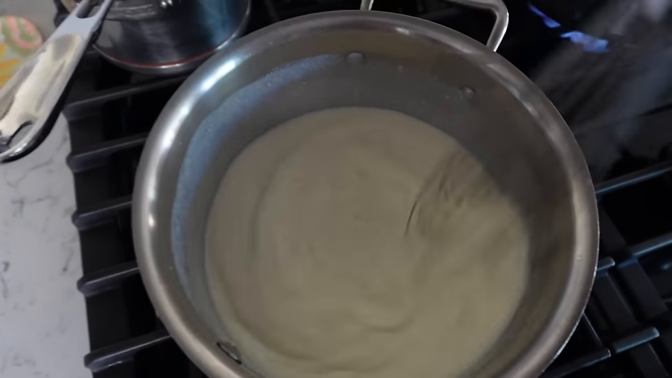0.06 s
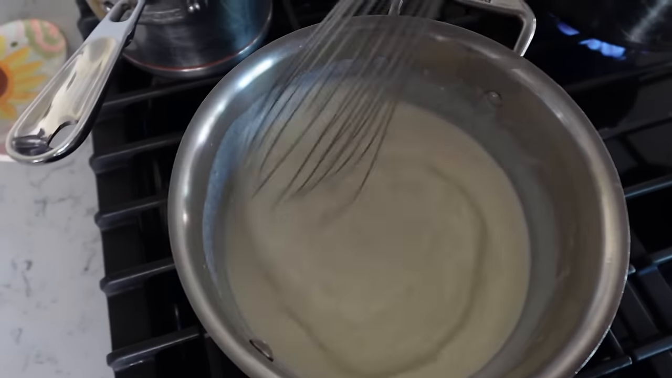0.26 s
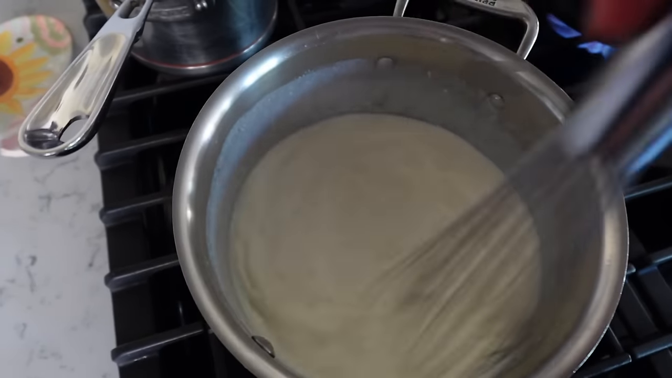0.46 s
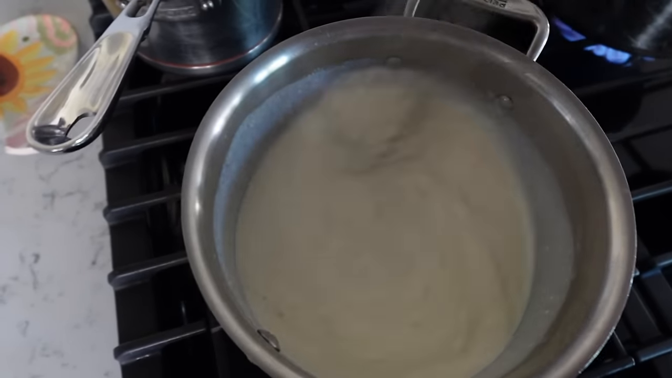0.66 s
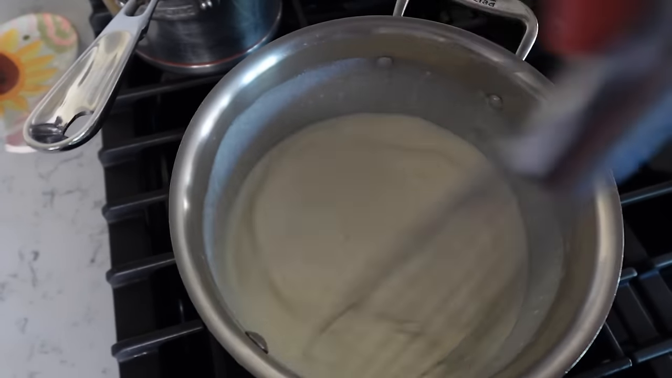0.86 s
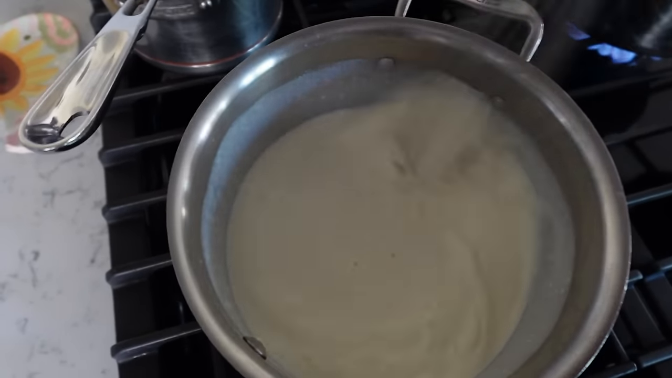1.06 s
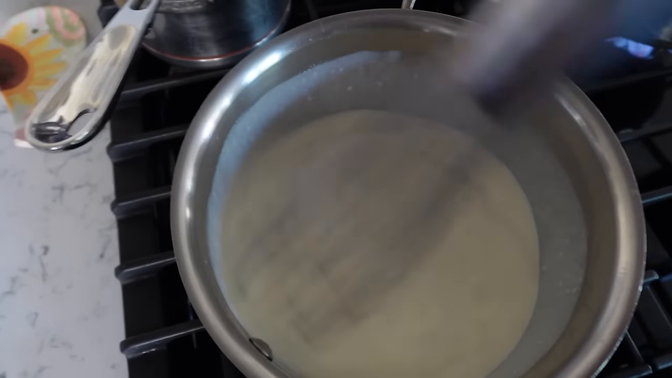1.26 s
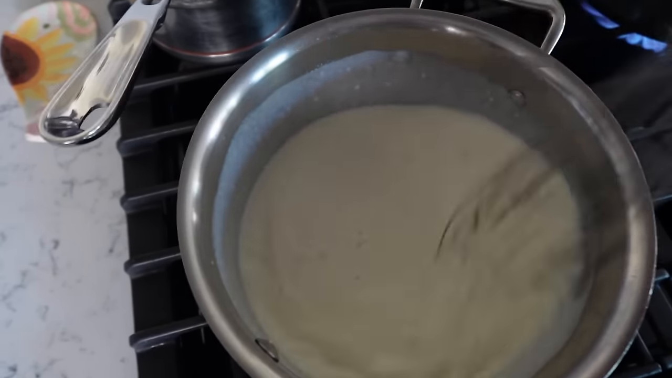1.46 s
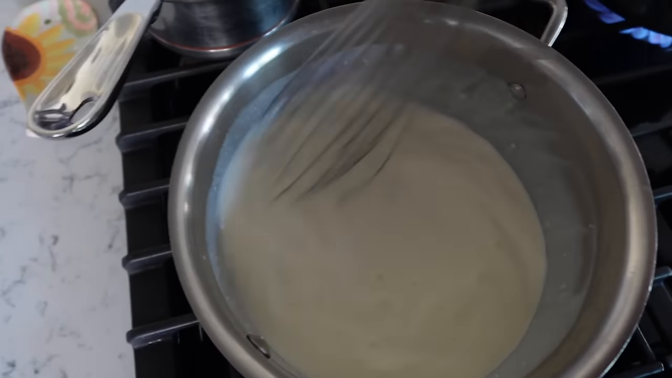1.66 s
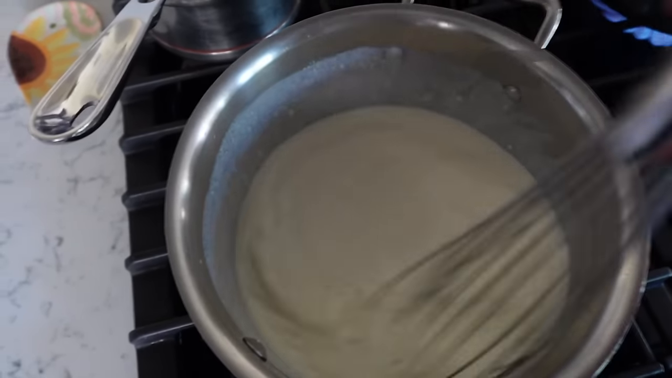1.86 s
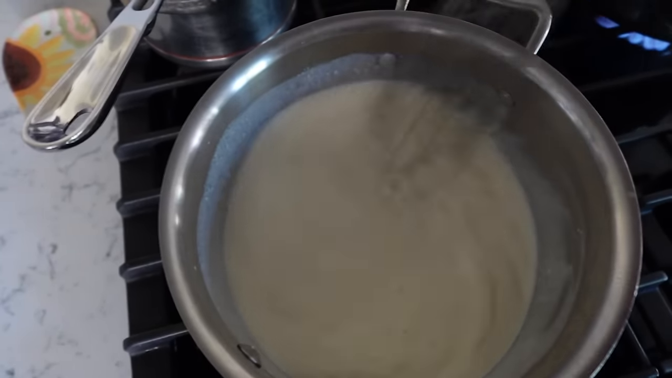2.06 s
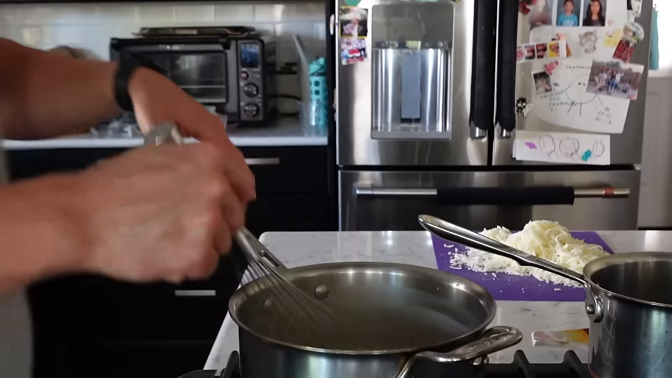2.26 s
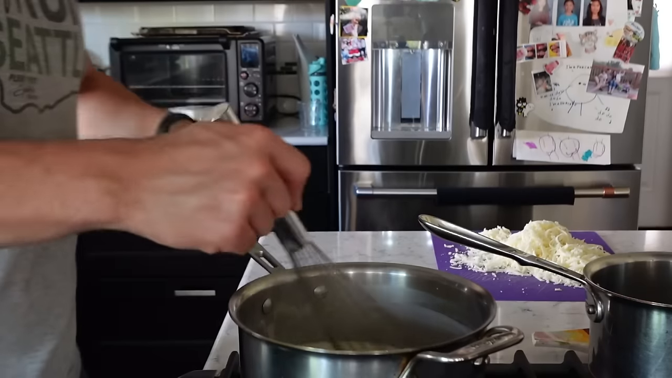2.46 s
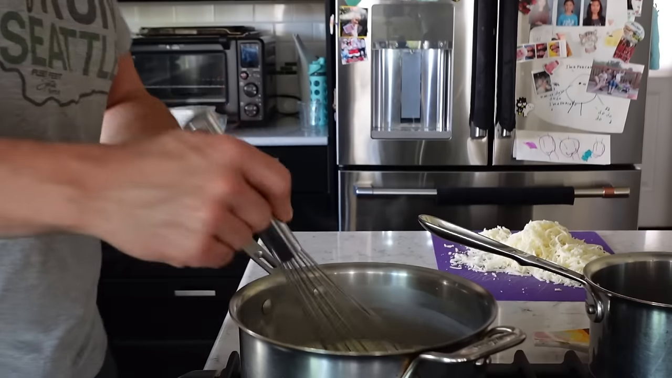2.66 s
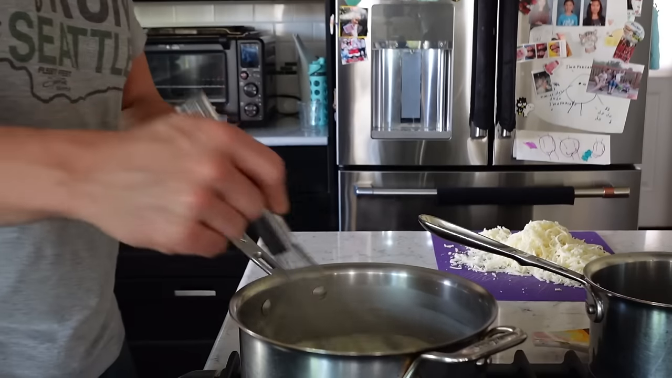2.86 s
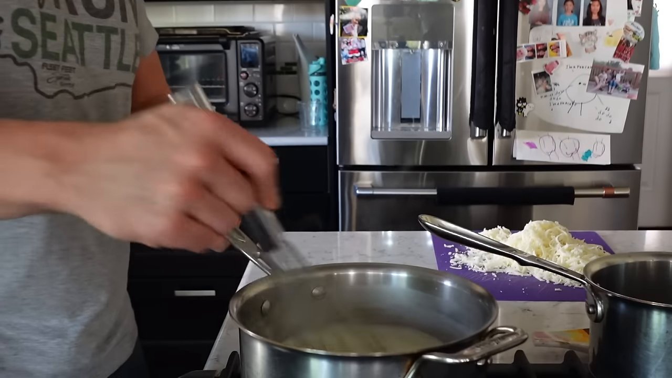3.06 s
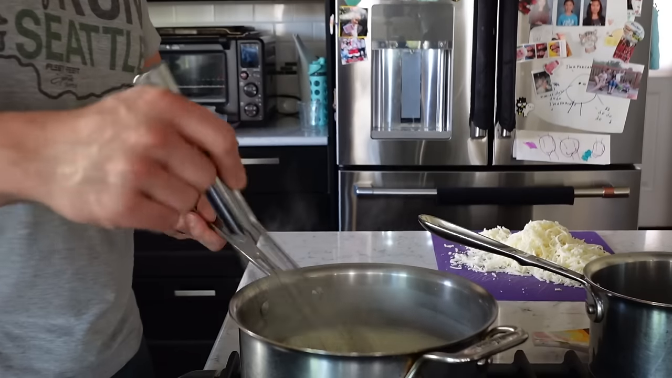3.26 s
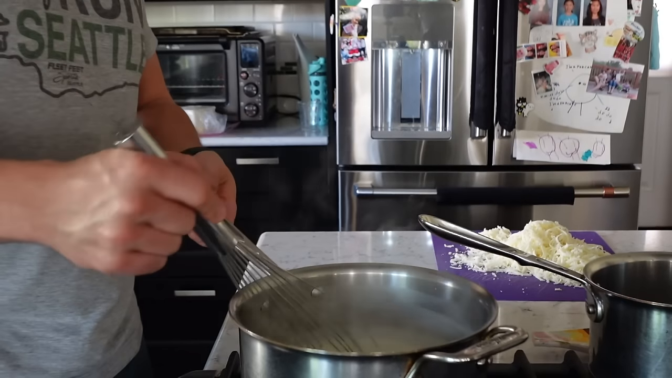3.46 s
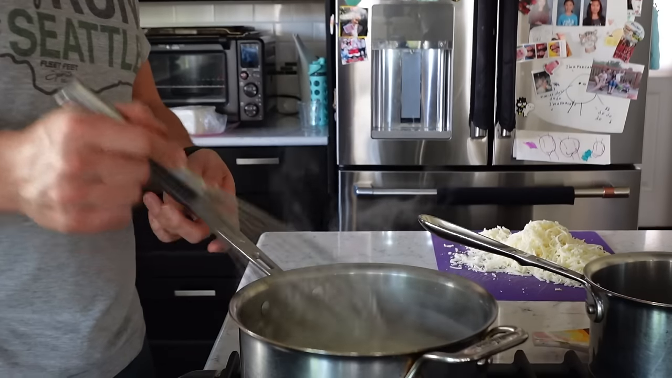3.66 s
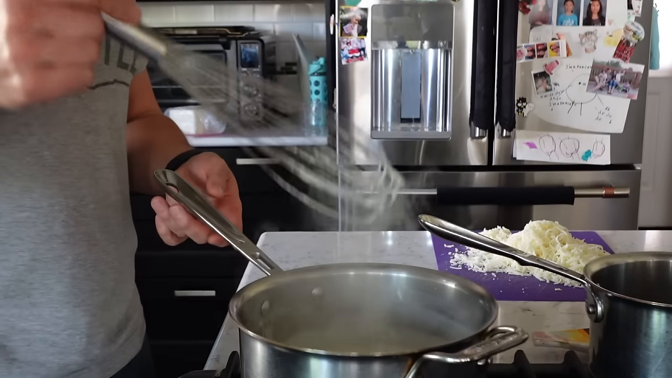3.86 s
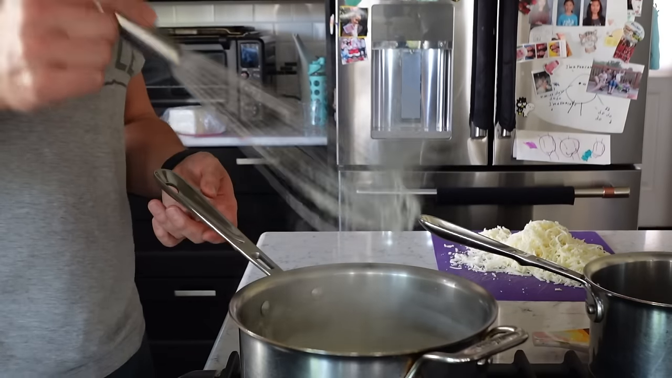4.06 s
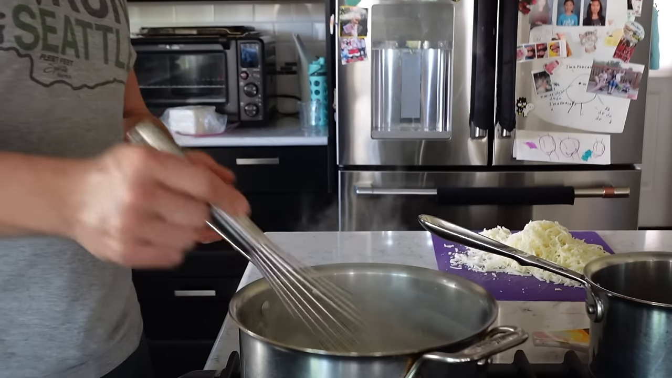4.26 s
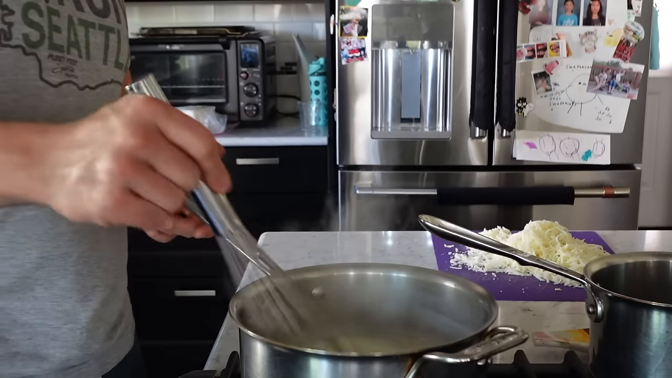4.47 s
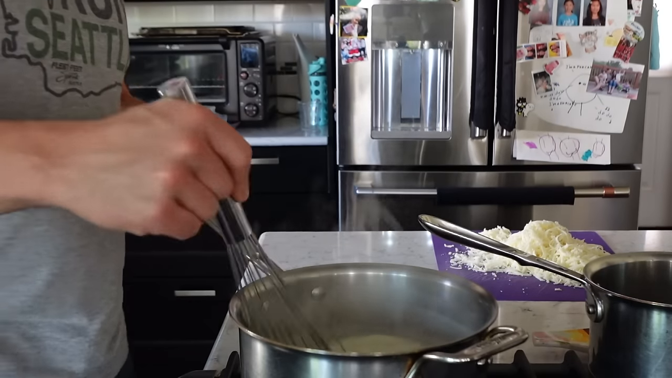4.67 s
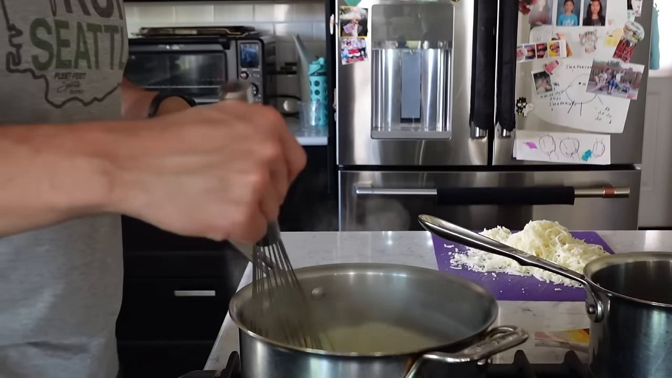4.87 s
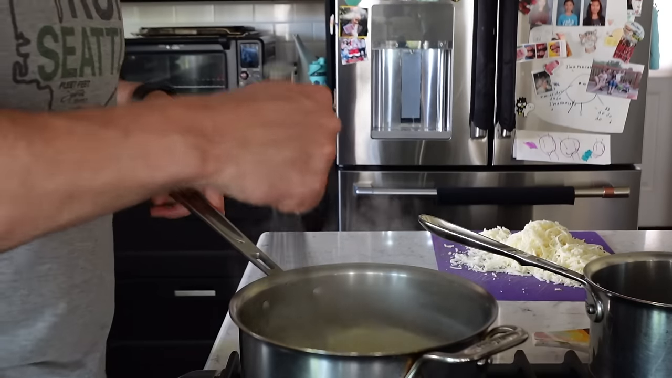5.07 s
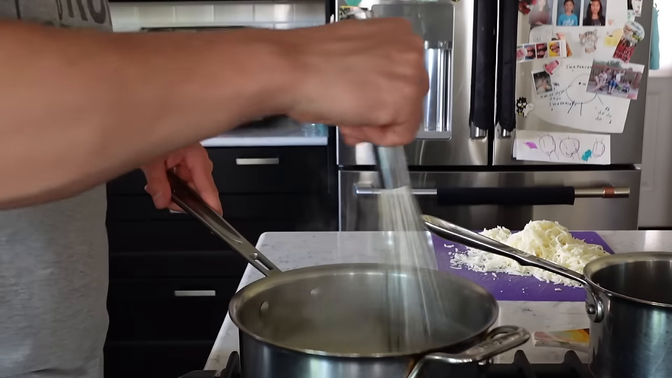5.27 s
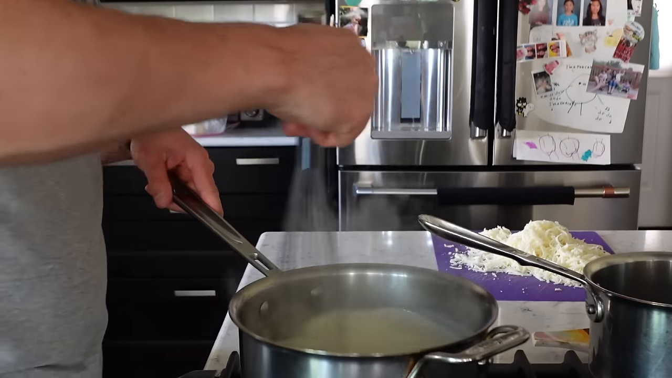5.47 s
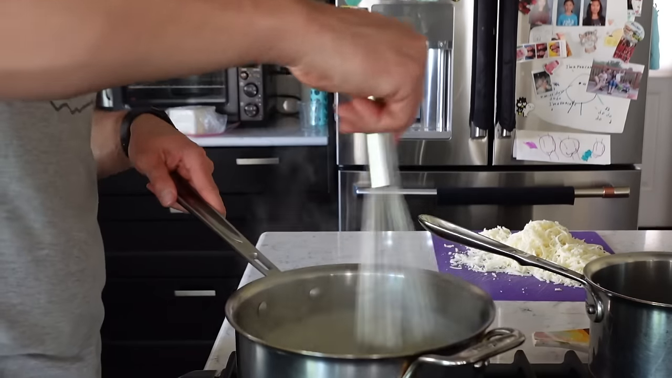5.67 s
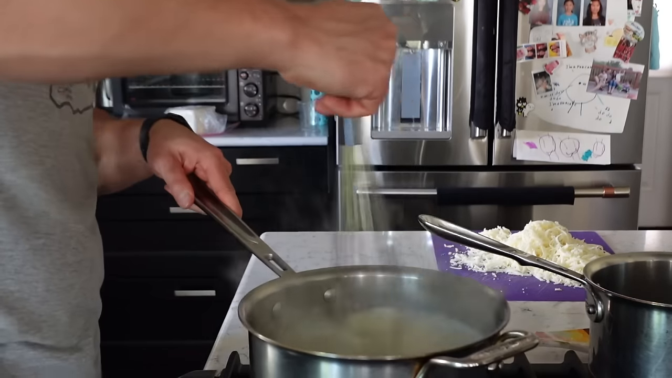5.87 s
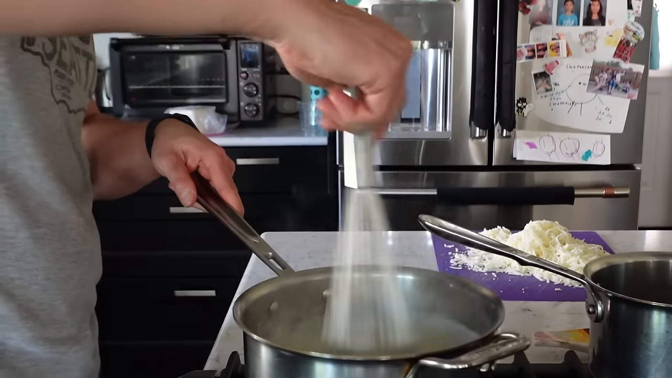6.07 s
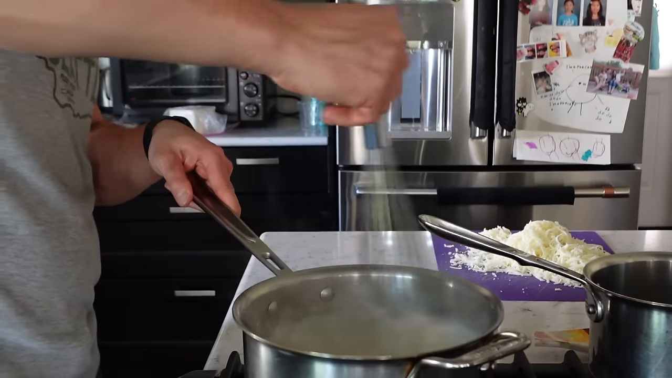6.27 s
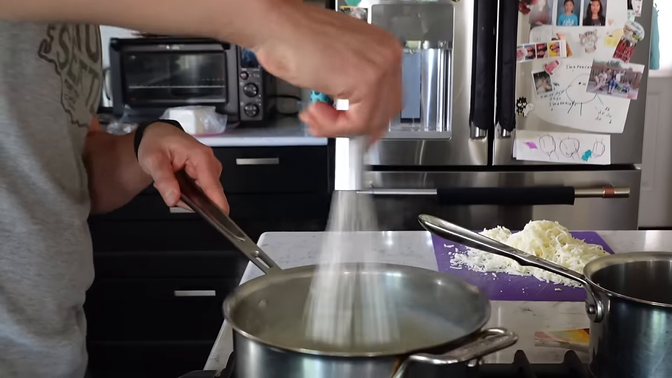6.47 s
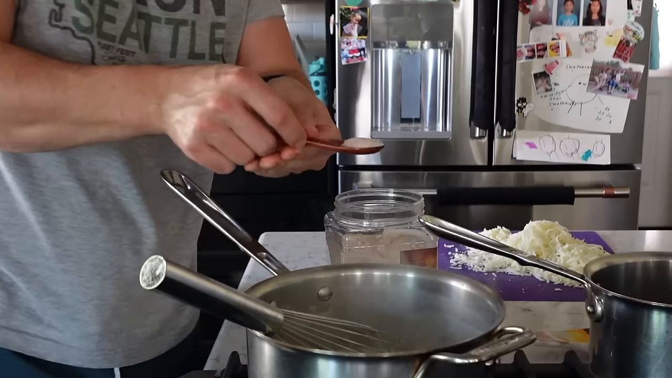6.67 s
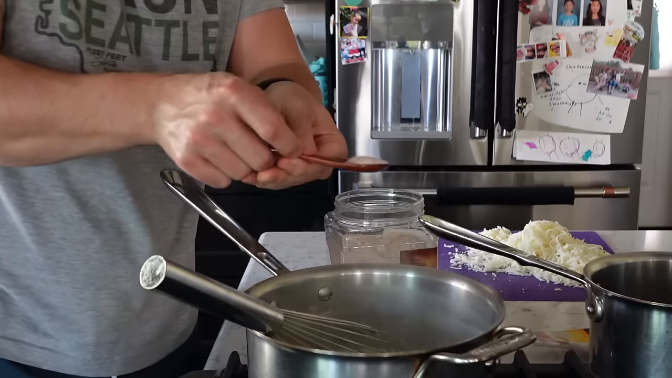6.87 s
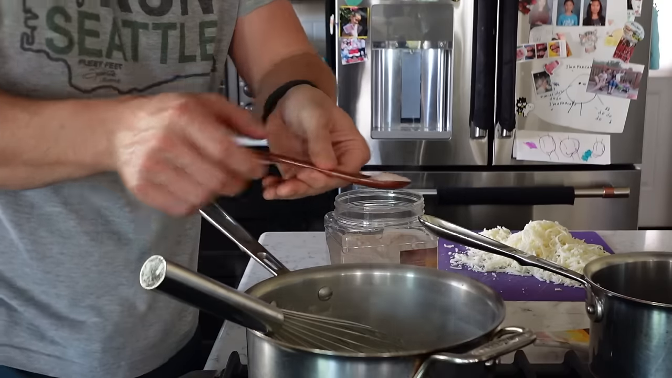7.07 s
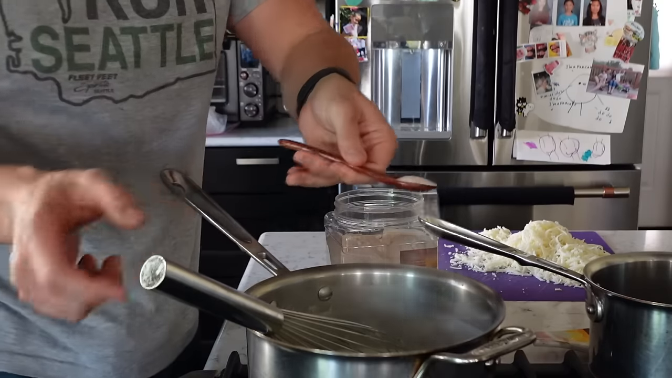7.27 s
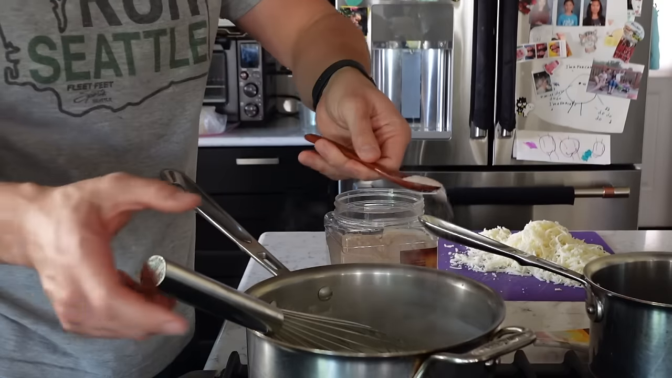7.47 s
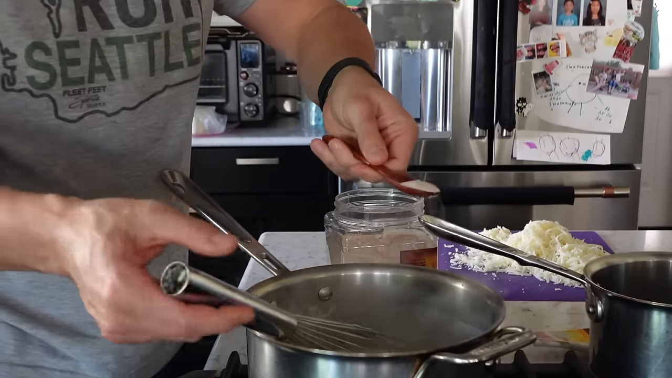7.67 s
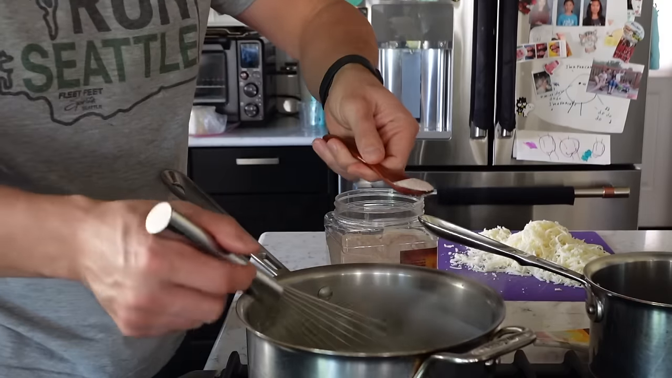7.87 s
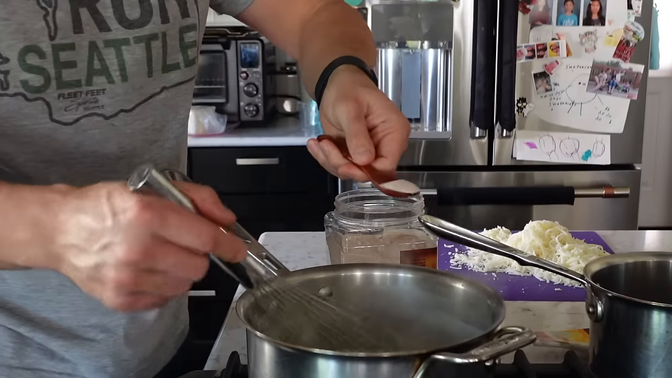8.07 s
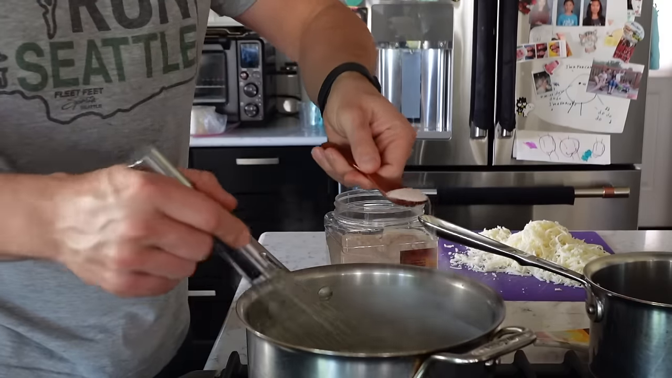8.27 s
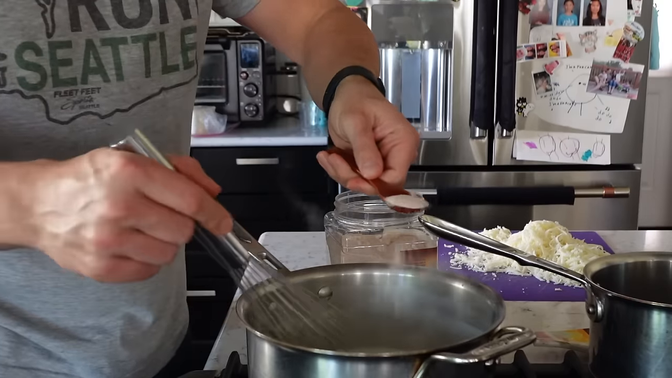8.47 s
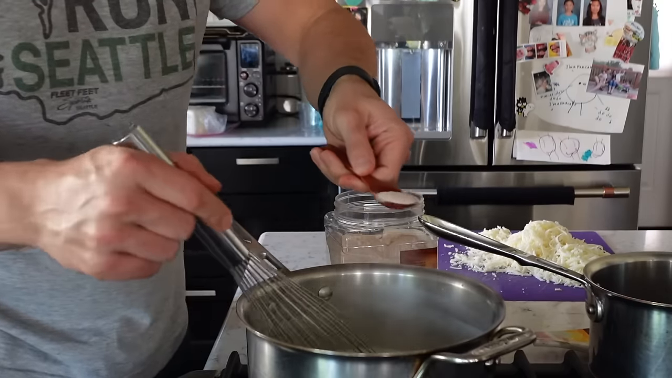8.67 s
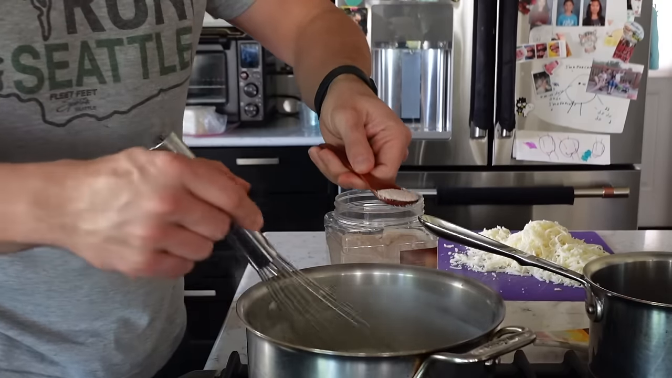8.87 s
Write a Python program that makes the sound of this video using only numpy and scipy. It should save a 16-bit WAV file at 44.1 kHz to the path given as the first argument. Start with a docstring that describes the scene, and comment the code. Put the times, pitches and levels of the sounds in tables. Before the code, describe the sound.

A low, steady motor hum and soft air hiss underlie metal whisking in a pan on a stove. Rapid scratchy strokes and wire rattles come first, heard close from above, then from the side with hollow pan knocks and a brief lull. Lively rattling strokes return before an abrupt drop to near quiet, light taps and delicate scraping. Short room echo, mono.

```python
"""In a kitchen, a wire whisk beats and scrapes sauce in a steel saucepan on a stove grate; a motor hums.
The microphone stands in three places in turn: over the pan, beside it, and beside it again later,
when the whisk first rests and then stirs gently. Scraping is made of clicks and noise, the ringing pan
of filters that resonate, the motor of steady tones, and the air of coloured noise.
Knocks, taps and ticks are short sounds that die away."""
import sys
import numpy as np
from scipy import signal
from scipy.fft import rfft, irfft
from scipy.io import wavfile

SR = 44100
rng = np.random.default_rng(int(sys.argv[2]) if len(sys.argv) > 2 else 0)


def wrap_up_sound(samples):
    """Save the sound to the file named by the first command line argument, as 16-bit audio."""
    columns = np.atleast_2d(samples).T
    # keep every value between -1 and 1, then stretch to whole-number steps
    tamed = np.clip(columns, -1, 1)
    steps = np.round(tamed * 32767).astype(np.int16)
    wavfile.write(sys.argv[1], SR, steps)


N = 393372   # length in samples

# When each microphone place begins; the last entry is the end. Each entry: time in seconds.
PLACE_TIMES = [0, 2.166, 6.537, 8.92]


def place():
    """Number the microphone place, 0 to 2, at every sample."""
    return np.searchsorted(PLACE_TIMES[1:3], np.arange(N) / SR)


def before_move(start, t):
    """True until the microphone next moves, so that a sound stops there."""
    return start + t < PLACE_TIMES[np.searchsorted(PLACE_TIMES, start)]


def amp(db):
    """Turn decibels into a gain; twice the decibels gives a power."""
    return 10 ** (np.asarray(db) / 20)


def rms_one(x):
    """Scale a signal so that its root mean square is 1."""
    return x / np.sqrt(np.mean(x ** 2) + 1e-20)


def drift(rate):
    """Wander randomly around zero with spread 1; a higher rate (Hz) wanders faster."""
    step = 40   # samples between the points of the slow curve
    r = np.exp(-2 * step * np.pi * rate / SR)
    noise = rng.standard_normal(N // step + 2002)
    slow = signal.lfilter([1], [1, -2 * r, r * r], noise)[2000:]   # leave out the settling
    slow = rms_one(slow - slow.mean())
    return np.interp(np.arange(N) / step, np.arange(len(slow)), slow)


def coloured(x, spectrum):
    """Give a flat signal a spectrum, drawn through points of Hz and dB."""
    hz, db = np.transpose(spectrum)
    bins = np.maximum(np.arange(N // 2 + 1) * SR / N, 1)
    return irfft(rfft(x) * amp(np.interp(np.log(bins), np.log(hz), db)), N)


def band(x, low_hz, high_hz):
    """Keep the pitches between two limits."""
    sos = signal.butter(2, [low_hz, high_hz], "band", fs=SR, output="sos")
    return signal.sosfilt(sos, x)


def resonance(x, hz, width):
    """Ring at one pitch; a narrow width (Hz) rings longer. Unit white noise comes out at rms 1."""
    r = np.exp(-np.pi * max(width, 5) / SR)
    gain = np.sqrt((1 - r * r) / 2)
    return signal.lfilter(gain * np.array([1, 0, -1]), [1, -2 * r * np.cos(2 * np.pi * hz / SR), r * r], x)


def pings(events, noisy):
    """Play short dying tones, each a pure tone plus a share of noise ringing around its pitch."""
    out, t = np.zeros(N + SR), np.arange(SR // 4) / SR
    puffs = rng.standard_normal((len(events), len(t)))
    for (start, db, hz, t60), puff in zip(events, puffs):
        tone = np.sin(2 * np.pi * hz * t) + noisy * resonance(puff, hz, 0.092 * hz)
        tone *= before_move(start, t)
        fade = amp(db - 60 * t / np.clip(t60, .01, .5))
        out[round(start * SR):][:len(t)] += fade * tone
    return out[:N]


# Colour of the kitchen air.
# Each row: pitch in Hz, then relative level in dB per Hz at each of the three places.
AIR_COLOUR = [(25, -25.5, -31, -32), (60, -13.5, -15, -5), (113, 3, -4, 4), (199, 0, -4.5, 1.5),
              (304, -2, -6.5, -1), (398, 0, -10.5, 5.5), (512, -14, -15.5, -10.5), (660, -34, -37, -30),
              (1060, -44, -19.5, -15), (1310, -10, -27, -18.5), (1740, -17, -22.5, -13),
              (2270, -27, -26, -31), (3500, -39, -27, -26), (5500, -35.5, -29, -34.5),
              (8000, -27.5, -36, -27), (16000, -40, -37, -34)]
# Loudness of the air, before a slow drift. Each entry: rms level in dB at one place.
AIR_LEVELS = [-44.5, -44, -45.5]


def air():
    """Colour white noise into the steady hiss and rumble of the kitchen, wavering slightly."""
    white, at, table = rng.standard_normal(N), place(), np.array(AIR_COLOUR)
    heard = [rms_one(coloured(white, table[:, [0, k + 1]])) for k in range(3)]
    level_db = np.array(AIR_LEVELS)[at] + 1.0 * drift(9)
    return amp(level_db) * np.choose(at, heard)


MAINS_HUM_HZ, TURNS_HZ = 119.9, [44.82, 44.94, 44.28]   # magnetic hum; motor turns a second at each place
# Where the motor tones sit. Each row: multiple of the hum, multiple of the turn rate.
MOTOR_ORDERS = [(1, 0), (2, 0), (3, 0), (0, 1), (0, 2), (0, 3), (0, 4), (0, 5), (0, 6), (0, 7), (0, 8),
                (0, 9), (1, 1), (1, 2), (1, 3), (1, 4), (1, 5), (1, 6), (2, -2), (2, -1), (2, 1), (2, 3),
                (2, 4), (2, 6)]
# How loud those tones are. Each row: one place, with the rms level in dB of every tone in turn.
MOTOR_LEVELS = [
    [-50.5, -46.5, -78, -82, -91, -56.5, -49.5, -57, -57.5, -99, -99, -59, -75, -93, -80, -93, -80, -58,
     -87, -83, -90, -49.5, -73, -60],
    [-44.5, -53.5, -81.5, -77, -76, -48.5, -43.5, -46, -57, -76, -59, -80, -55.5, -57, -78, -65, -81, -69,
     -54.5, -72, -62, -61.5, -62, -63.5],
    [-47, -73, -56, -69, -66, -48.5, -41, -52, -54, -56, -73, -51, -60, -52, -54, -49, -51.5, -53.5, -57,
     -70, -64, -50, -73, -69],
]


def motor():
    """Mix magnetic hum and turn rate into sum and difference tones; the turn rate wavers a little."""
    t, at, out = np.arange(N) / SR, place(), np.zeros(N)
    wavering_time = t + np.cumsum(0.0018 * drift(1.57)) / SR
    hum, turn = np.transpose(MOTOR_ORDERS)[:, :, None]
    for k in range(3):
        here = at == k
        cycles = hum * MAINS_HUM_HZ * t[here] + turn * TURNS_HZ[k] * wavering_time[here]
        tones = np.sin(2 * np.pi * (cycles + rng.random(hum.shape)))
        out[here] = np.sqrt(2) * amp(MOTOR_LEVELS[k]) @ tones
    return out


LANDS_S = 4.307   # the lifted whisk drops back into the pan


def swell(start, held, rise, fall):
    """Grow in power to 1, hold and sink again; rise and fall are seconds per 10 dB, at least 3 ms."""
    out, t = np.zeros(N), np.arange(N) / SR
    k = np.searchsorted(PLACE_TIMES[1:3], start)
    held, rise, fall = max(held, 0), max(rise, .003), max(fall, .003)
    # stay within one place, and start no earlier than the landing if the sound comes after it
    first = max(PLACE_TIMES[k], LANDS_S * (start > LANDS_S), start - 4 * rise)
    last = min(PLACE_TIMES[k + 1], start + held + 4 * fall)
    near = slice(int(first * SR), int(last * SR))
    before, after = (start - t[near]) / rise, (t[near] - start - held) / fall
    out[near] = amp(-20 * np.maximum(0, np.maximum(before, after)))
    return out


# Light contact between strokes, one table for each place.
# Each row: time in seconds, scrape in dB, rub on the pan floor in dB, level above 8 kHz in relative dB.
LIGHT_CONTACT = [
    [(0, -29.5, -42, -6), (.85, -30, -46.5, -5.5), (1.1, -31.5, -43, -4), (1.35, -34, -56, -6.5),
     (1.52, -33, -52, -7), (1.88, -34, -48, -6.5), (2.166, -29, -41, -5.5)],
    [(2.166, -37.5, -42.5, -2.5), (3.0, -33, -42.5, -1.5), (3.3, -33.5, -43.5, -4.5),
     (3.66, -41, -42, -6.5), (3.92, -40, -50, -3), (4.14, -48, -55, -8), (4.22, -61, -68, -10),
     (4.304, -80, -85, -10), (4.31, -41, -50, -2), (4.5, -41, -54, -4), (4.9, -37, -46, 1.5),
     (5.2, -37.5, -46.5, -1), (5.6, -33, -48, -2), (6.537, -36, -52, -1)],
    [(6.537, -70, -63, 2), (6.9, -58.5, -53, -11), (7.33, -64, -62, -5), (7.89, -63, -61, -4),
     (8.1, -55, -53.5, 0), (8.45, -44, -54.5, -1), (8.92, -60, -59.5, -2)],
]
# Ringing of the pan under light contact. Each entry: relative level in dB at one place.
LIGHT_RINGING = [-1.5, 0.5, 3]
# The whisk is drawn through the pan. Each row: time of full strength in seconds, held time in seconds,
# scrape in dB, rub on the pan floor in dB, ringing in dB relative to the scrape,
# rise in seconds per 10 dB, fall in seconds per 10 dB (swell() raises times that are too short).
WHISK_SWEEPS = [(0, 0.023, -21, -32, -4, .1, 0.05), (0.171, .14, -19.5, -37, -1.5, .07, -0.07),
                (.41, 0.053, -24, -48.5, -3, .01, -0.1), (.47, 0, -25, -39, -4, -0.03, .05),
                (0.541, 0.054, -23, -38.5, 1, .02, -0.04), (.606, 0.055, -22.5, -36.5, -1, .004, -0.14),
                (0.731, 0.043, -17.5, -38.5, -3.5, 0.08, 0.04), (.865, 0.032, -26, -55, 6, .01, .05),
                (.92, 0.043, -23.5, -37.5, 0, 0, 0.03), (1.08, 0.044, -20.5, -37.5, 0, 0.06, 0.12),
                (1.24, 0.028, -28, -40, 0, 0.1, -0.07), (1.335, 0.044, -27.5, -60, 5.5, 0.03, 0),
                (1.42, 0.014, -27.5, -37.5, 2.5, -0.1, .07), (1.56, .19, -23, -42.5, -0.5, 0.06, -0.1),
                (1.78, .05, -24, -50, 5, .005, .04), (1.93, .03, -25, -42, 3, .005, .06),
                (2.02, 0.029, -27.5, -39, -11, -0.1, 5), (2.089, .075, -20, -33.5, -2, -0.06, 0),
                (2.17, 0.0047, -28, -38, 3.5, 0.5, 0), (2.36, 0.054, -30, -50, -3, .1, 0.03),
                (2.5, 0.018, -31.5, -37.5, -4, 0.3, 0), (2.65, 0.0097, -27.5, -38.5, -3, .03, 0.15),
                (2.84, 0.027, -27, -36, -1, .02, 0.06), (3.07, 0, -24.5, -37.5, 3, .05, 0.0546),
                (3.2, .02, -32, -42, 3, .03, .04), (3.385, .04, -21, -28, 1, 0.08, 0.1133),
                (3.52, 0.084, -27, -32, 1, -0.14, .05), (4.32, 0.028, -27.5, -35, -0.5, 3, .11),
                (4.53, 0.11, -35, -45, 2.5, 0, .06), (4.66, 0.0028, -35.5, -47, -1, 0, 0.1),
                (4.75, .14, -34, -44.5, -3.5, -0.1, 0.1), (4.98, 0.03, -28, -41, -2, -0.07, -0.23),
                (5.08, 0.055, -24.5, -56, -5, -0.02, -0.1), (5.275, .055, -25, -41, 1, 0.064, .06),
                (5.42, 0.067, -27, -57, 3.5, 0.08, .08), (5.61, 0.063, -26, -42.5, -2, -0.01, 0.07),
                (5.83, 0.043, -27, -40.5, -0.5, -0.05, .06), (5.98, 0.075, -28.5, -41.5, 1, 0, -0.4),
                (6.07, 0.038, -22.5, -39.5, 1.5, -0.05, .07), (6.29, 0.012, -28.5, -47, 2, 0, 0.2),
                (6.39, 0.026, -25.5, -47, 1.5, 0, 0.2), (6.49, 0.036, -21.5, -44.5, -1, -0.01, -0.6),
                (6.72, 0.065, -52, -58.5, -6, 0.2, 0.2), (7.14, 0, -58, -64, -4, 0.2, 0.7),
                (7.9, 0.0017, -49, -55, -5, .005, .05), (8.04, 0.0038, -41.5, -47.5, -4, 0.07, -0.04),
                (8.2, .12, -40.5, -54, 1, 0.1, 0.1), (8.41, 0.019, -39, -58, -1, 0.05, -0.1),
                (8.52, 0.07, -42, -54, -2, .06, -0.8), (8.66, .03, -44.5, -50, 1, -0.02, -0.3),
                (8.8, 0.07, -43.5, -57, 3, .05, .1), (8.88, 0.022, -40, -50, 4, 0.03, .1)]


def strokes():
    """Add sweeps to light contact: power of scrape, floor rub and ringing, and the treble level in dB."""
    t, at, light = np.arange(N) / SR, place(), np.zeros((3, N))
    for k, rows in enumerate(LIGHT_CONTACT):
        times, *columns = np.transpose(rows)
        light[:, at == k] = [np.interp(t[at == k], times, column) for column in columns]
    scrape_db, floor_db, treble_db = light
    power = amp(2 * np.array([scrape_db, floor_db, scrape_db + np.array(LIGHT_RINGING)[at]]))
    for start, held, scrape_db, floor_db, ring_db, rise, fall in WHISK_SWEEPS:
        sweep_db = np.array([[scrape_db], [floor_db], [scrape_db + ring_db]])
        power += amp(2 * sweep_db) * swell(start, held, rise, fall)
    return *power, treble_db


def friction(per_s, spread_db, smooth):
    """Make wires slip and catch: uneven random clicks over a smooth rub of noise."""
    sizes = amp(spread_db * np.minimum(rng.exponential(1, N), 3.5)) * rng.choice([-1, 1], N)
    chance = per_s * amp(4 * drift(40)) / SR
    clicks = sizes * (rng.random(N) < chance)
    return rms_one(rms_one(clicks) + smooth * rng.standard_normal(N))


# Colour of the scrape from over the pan. Each row: pitch in Hz, relative level in dB per Hz.
ABOVE_COLOUR = [(350, -32), (600, -2.5), (748, -37), (984, -9.5), (1230, -13.5), (2470, -7), (5120, -2.5),
                (7520, -2), (14700, -2.5), (16000, -4)]
# Colour of the scrape from beside the pan. Each row: pitch in Hz, relative level in dB per Hz.
SIDE_COLOUR = [(350, -22), (600, -14.5), (1830, -6), (1980, -46), (2210, -7.5), (3990, -2), (4520, -6),
               (6550, 2.5), (14900, -8), (16000, -9)]


def broad_scrape(slips, floor_db, treble_db):
    """Colour the dense slips and mix three bands: pan floor, middle and treble."""
    broad = np.where(place() == 0, coloured(slips, ABOVE_COLOUR), coloured(slips, SIDE_COLOUR))
    bands = [band(broad, 825, 2460), band(broad, 2780, 8530), band(broad, 7220, 15500)]
    levels_db = [floor_db + 2.2 * drift(11.3), -3.0, treble_db + 1.26 * drift(6.4)]
    return amp(-1.5) * sum(rms_one(b) * amp(db) for b, db in zip(bands, levels_db))


def flecks(per_s, level_db):
    """Wires brush one another at random and chirp briefly, each at one of 24 pitches."""
    born = rng.random(N) < per_s / SR
    sizes = amp(4.7 * np.minimum(rng.exponential(1, N), 3))
    dealt = rng.integers(0, 24, N)   # which pitch each chirp gets
    pitches = np.geomspace(2900, 14500, 24) * (1 + 0.0367 * rng.standard_normal(24))
    chirps = np.zeros(N)
    for k, hz in enumerate(pitches):
        chirps += resonance(sizes * born * (dealt == k) + 1e-18, hz, 0.011 * hz)
    return amp(level_db) * rms_one(chirps)


# Pan and wires ring. Each row: pitch in Hz, width in Hz before narrowing,
# then relative level in dB at each of the three places.
PAN_MODES = [(957, 81, -7, -9.5, -12.5), (1270, 17, -34.5, -12, -22), (1608, 32, -15, -27, -9.5),
             (1990, 72, -6, -7, -9), (2123, 186, -1, -7.5, -11), (2403, 30, -18, -16, -6.5),
             (2554, 62, -15.5, -11.5, -22), (3245, 210, -9.5, -4, -9.5), (3425, 114, -29, -4, -6.5),
             (3950, 210, 6, 1.5, 0.5), (4237, 140, 0.5, -1, -9), (4530, 250, -9, -6, 0),
             (4780, 160, -26, -9, -11), (5080, 320, 6.5, -7, -10), (5370, 26, -10, -6, -24),
             (5780, 670, -20, -5.5, -4), (6590, 110, -9, -1.5, -3), (7360, 850, -13, 2, 2.5),
             (8740, 640, -2.5, -4, -10), (9280, 330, 4, -4, -8), (10180, 540, 2.5, -3, -7),
             (11330, 1200, -31, -4, -6), (12800, 200, -10, -9, -9), (14760, 650, 0, -9, -8)]
# Narrowing of the rings. Each entry: factor on the width at one place; a smaller one rings longer.
MODE_NARROWING = [0.74, 1, 0.74]


def pan_ringing(catches, struck, floor_db, treble_db):
    """Let catches ring the pan and wires; each mode wanders in level by itself."""
    at, out = place(), np.zeros(N)
    for k, (hz, width, *place_db) in enumerate(PAN_MODES):
        share_db = floor_db + 11.5 if hz < 2300 else treble_db + 6.5 if hz > 8000 else 0
        wander_db = 2.64 * drift(20.5) + 2.13 * drift(5.0)
        level_db = np.array(place_db)[at] + share_db - 14.5 + wander_db
        driven = catches * struck[k % 4] * amp(level_db)
        for j, narrow in enumerate(MODE_NARROWING):
            ring = resonance(driven[at == j], hz, width * narrow)
            out[at == j] += ring * (-1) ** k   # flip every second mode
    return out


# The pan shudders on the grate. Each row: time of the peak in seconds, relative level in dB.
GRATE_JOLTS = [(.03, -51), (.11, -55), (.57, -55), (.82, -52.5), (.91, -52.5), (1.44, -52), (1.74, -55),
               (2.06, -58), (2.25, -49.5), (2.44, -44), (2.65, -47), (2.87, -43), (3.07, -47.5),
               (3.17, -43.5), (3.41, -38), (3.6, -49), (4.345, -46), (4.57, -50.5), (4.76, -50),
               (4.97, -55), (5.69, -52), (5.82, -51.5), (6.12, -54.5), (6.33, -54), (6.52, -55),
               (6.68, -60), (7.6, -59), (7.95, -58), (8.39, -60), (8.58, -57), (8.69, -59), (8.83, -59)]
# Rings of the pan on the grate.
# Each row: pitch in Hz, width in Hz (doubled in each of two filters), relative level in dB.
GRATE_MODES = [(418.5, 21, 0.5), (459, 30.7, 3.5), (518, 38, -4)]


def grate_shudder(slips):
    """Ring the pan on its grate: a steady weak shudder that swells at each jolt."""
    rise_s, fall_s, steady_db = 0.058, 0.075, -69   # seconds per 10 dB; relative level between jolts
    power = amp(2 * steady_db)
    for start, db in GRATE_JOLTS:
        power = power + amp(2 * db) * swell(start, 0, rise_s, fall_s)
    out = np.zeros(N)
    for hz, width, db in GRATE_MODES:
        ring = resonance(resonance(slips, hz, 2 * width), hz, 2 * width)
        out += np.sqrt(power) * amp(db + 2.4 * drift(10.0)) * rms_one(ring)
    return out


# Wires strike the wall. Each row: start in seconds, relative level in dB,
# time to fall by 60 dB in seconds (cut to 0.5 at most), pitch in Hz of the wire that sings loudest.
WIRE_HITS = [(.0209, -22.5, .14, 5360), (0.1006, -21.5, 0.11, 6360), (0.134, -23, 0.21, 4710),
             (0.362, -21, .08, 5100), (0.3884, -18.5, 0.22, 5350), (0.467, -18, 0.15, 3960),
             (.5314, -23.5, 0.19, 5080), (0.604, -21, 0.17, 3730), (.694, -30, 0.28, 4100),
             (.8593, -19, 0.31, 4880), (0.972, -18, 0.055, 4700), (1.064, -27, 0.35, 3810),
             (1.2235, -19.5, 0.48, 5000), (1.3297, -23.5, 0.32, 5220), (1.541, -20, 0.15, 4750),
             (1.5917, -20.5, 0.57, 4120), (1.7276, -21, 0.16, 4130), (1.7729, -22, 0.15, 5130),
             (1.9272, -20.5, 0.18, 5200), (2.035, -22, .052, 3240), (2.07, -23, 0.076, 3960),
             (2.356, -18, .064, 5270), (2.6142, -19.5, 0.091, 6460), (2.7447, -31.5, .18, 4130),
             (2.827, -20, 0.13, 6600), (3.032, -21, 0.099, 6420), (3.2844, -20, .067, 3660),
             (3.3332, -20.5, .075, 4120), (3.37, -18.5, 0.23, 6770), (3.798, -32, 0.33, 3110),
             (4.3072, -23.5, 0.081, 6590), (4.3606, -24, 0.077, 6900), (4.7363, -34.5, 0.1, 4000),
             (4.8197, -31, .13, 4200), (4.847, -30, .12, 4700), (4.943, -29, 0.14, 4630),
             (5.074, -21.5, 0.58, 6470), (5.221, -29.5, 0.26, 4030), (5.2619, -29, 0.092, 6500),
             (5.398, -28, 0.13, 3200), (5.409, -20, 0.14, 6880), (5.432, -24.5, 0.14, 4150),
             (5.5857, -22.5, 0.097, 5180), (5.6562, -16, 0.045, 6780), (5.7603, -33, 0.23, 3500),
             (5.8277, -20, 0.091, 6480), (5.8668, -23, 0.091, 4010), (5.9326, -29, 0.23, 3930),
             (5.9896, -31, 0.14, 4120), (6.0299, -25.5, 0.27, 3330), (6.046, -21, 0.13, 4840),
             (6.2094, -24.5, 0.11, 5360), (6.2481, -23, 0.24, 3310), (6.2863, -18.5, 0.13, 3360),
             (6.3677, -22.5, 0.2, 4120), (6.4603, -26, 0.082, 3390), (6.4851, -17, 0.089, 3420),
             (6.71, -47.5, .2, 5620), (7.9014, -46, 0.1, 3700), (8.086, -41.5, 0.054, 3960),
             (8.11, -44, .24, 3950), (8.1574, -42.5, 0.099, 6000), (8.344, -32, 0.1, 4400),
             (8.4595, -39, 0.24, 4200), (8.493, -34, 0.073, 4020), (8.675, -38, 0.14, 4360),
             (8.7879, -44, .12, 4020), (8.8596, -33.5, 0.19, 4280)]


def rattles(extra_db, crack_db):
    """Shape the power of the hits: a brief crack, and a rattle of the wires that dies away."""
    out, t = np.zeros(N + SR), np.arange(SR // 4) / SR
    for (start, db, t60, _), more_db in zip(WIRE_HITS, extra_db):
        rattle = amp(-120 * t / np.clip(t60, .01, .5))
        crack = amp(2 * crack_db - 120 * t / 0.0097)
        shape = (rattle + crack) * before_move(start, t)
        out[round(start * SR):][:len(t)] += amp(2 * (db + more_db)) * shape
    return out[:N]


def singing_wires():
    """Let the loudest wire of each hit sing, almost as much stronger as the hit is."""
    songs = [(start, -24.5 + 0.93 * (db + 17.5), hz, t60) for start, db, t60, hz in WIRE_HITS]
    return pings(songs, noisy=0.7)


# Share of a hit's rattle that sounds in the pan floor. Each entry: relative level in dB at one place.
HIT_FLOOR_SHARE = [-26.5, -20, -12]
# Level of a hit's rattle above 8 kHz. Each entry: relative level in dB at one place.
HIT_TREBLE = [-5.5, 0, 1]


def whisk():
    """Dense slips make the broad scrape, sparser catches ring the pan, and hits rattle the wires."""
    scrape, floor, ring, treble_db = strokes()
    at = place()
    slips = friction(per_s=4000, spread_db=4.0, smooth=0.86)
    catches = friction(per_s=900, spread_db=1.0, smooth=0.89)
    rattle = rattles(np.zeros(len(WIRE_HITS)), crack_db=0.0)
    force = np.sqrt(scrape * amp(1.25 * drift(32)) + rattle)
    # floor and treble levels follow whichever is stronger, scrape or rattle
    rattle_on_floor = amp(2 * np.array(HIT_FLOOR_SHARE)[at]) * rattle
    floor_db = 10 * np.log10((floor + rattle_on_floor) / (scrape + rattle))
    treble_db = (scrape * treble_db + rattle * np.array(HIT_TREBLE)[at]) / (scrape + rattle)
    # each hit strikes four families of modes, each with its own random strength
    spread_db = rng.normal(0, 1.6, (len(WIRE_HITS), 4))
    struck = [np.sqrt(ring * amp(-3.5) + rattles(spread_db[:, k], crack_db=-10.5)) for k in range(4)]
    out = force * broad_scrape(slips, floor_db, treble_db)
    out += force * flecks(per_s=350, level_db=-11.5)
    out += pan_ringing(catches, struck, floor_db, treble_db)
    return out + grate_shudder(slips) + singing_wires()


# Lone short rings, of the pan under the whisk and of spoon and fingers while it rests.
# Each row: start in seconds, level in dB of the pure tone, pitch in Hz, time to fall by 60 dB in seconds.
LONE_TAPS = [(1.125, -39, 900, 0.13), (1.24, -44, 980, .15), (4.315, -40, 900, .2), (4.58, -39, 950, 0.22),
             (5.87, -40.5, 1990, 0.29), (6.075, -37.5, 1990, 0.27), (6.265, -39.5, 1990, 0.31),
             (6.381, -41, 1990, .15), (6.479, -39, 1270, 0.49), (6.842, -53, 5500, 0.32),
             (6.848, -55, 2950, .08), (6.857, -48, 1200, .14), (7.129, -53, 3700, .1),
             (7.286, -58, 4200, .062), (7.567, -53, 1640, .087), (7.64, -50, 1270, .16),
             (7.91, -47, 1660, 0.22), (8.345, -51, 934, 0.2), (8.84, -53, 953, .34)]


def taps():
    """Ring each tap as a dying tone roughened with noise."""
    return pings(LONE_TAPS, noisy=0.8)


# The pan knocks on the grate. Each row: start in seconds, level in dB of the main tone, pitch in Hz.
PAN_KNOCKS = [(2.362, -39, 438), (2.608, -38.5, 433), (2.649, -33, 395), (2.745, -35, 519),
              (2.867, -37.5, 393), (3.04, -45, 398), (3.333, -28, 500), (3.368, -26, 534),
              (4.31, -28.5, 493), (4.953, -43, 395), (5.822, -49, 495)]


def knocks():
    """Ring the filled pan dully and briefly with two tones close in pitch."""
    out, t = np.zeros(N), np.arange(SR // 4) / SR
    for start, db, hz in PAN_KNOCKS:
        ring = np.sin(2 * np.pi * hz * t) + .5 * np.sin(2 * np.pi * 0.95 * hz * t)
        soft_start = 1 - np.exp(-t / 0.0016)
        out[round(start * SR):][:len(t)] += amp(db - 60 * t / 0.23) * soft_start * ring
    return out


# Single wires spring free and tick. Each row: start in seconds, starting level in dB before filtering.
WIRE_TICKS = [(3.5457, -19), (3.7644, -33), (3.8154, -20), (3.88, -22), (3.905, -24), (3.952, -24),
              (3.9644, -25), (4.0133, -29), (4.0277, -30), (8.079, -38), (8.123, -32), (8.5455, -40),
              (8.558, -29)]


def ticks():
    """Make bright clicks a few milliseconds long from bursts of noise."""
    clicks, t = np.zeros(N), np.arange(SR // 100) / SR
    for start, db in WIRE_TICKS:
        burst = amp(db - 60 * t / 0.0082) * rng.standard_normal(len(t))
        clicks[round(start * SR):][:len(t)] += burst
    return band(clicks, 2000, 18000)


def kitchen(x, t60, level_db):
    """Add the room's short diffuse echo, dying noise that starts afresh at each place."""
    t = np.arange(SR // 2) / SR
    tail = band(rng.standard_normal(len(t)), 150, 7600) * amp(-60 * t / t60)
    tail *= t > .004   # the echo comes after the direct sound
    tail *= amp(level_db) / np.sqrt(np.sum(tail ** 2))
    at, out = place(), np.zeros(N)
    for k in range(3):
        echo = signal.fftconvolve(x * (at == k), tail)[:N]
        out += (at == k) * (x + echo)
    return out


def scene():
    """Mix everything into one microphone that feeds both channels."""
    pan = kitchen(whisk() + taps() + knocks() + ticks(), t60=0.52, level_db=-13.5)
    return np.tile(air() + motor() + pan, (2, 1))


def record(dry):
    """Round the peaks and cut the top of the treble."""
    cutoff_hz = 15830
    rounded = .75 * np.tanh(dry / .75)
    low_pass = signal.ellip(12, .5, 70, cutoff_hz, fs=SR, output="sos")
    return signal.sosfilt(low_pass, rounded)


dry = scene()
out = record(dry)
wrap_up_sound(out)
```